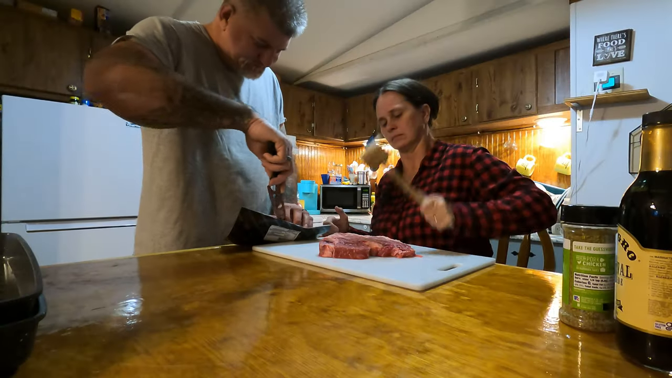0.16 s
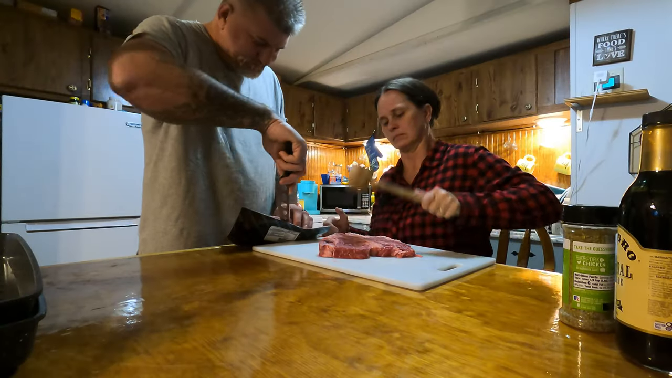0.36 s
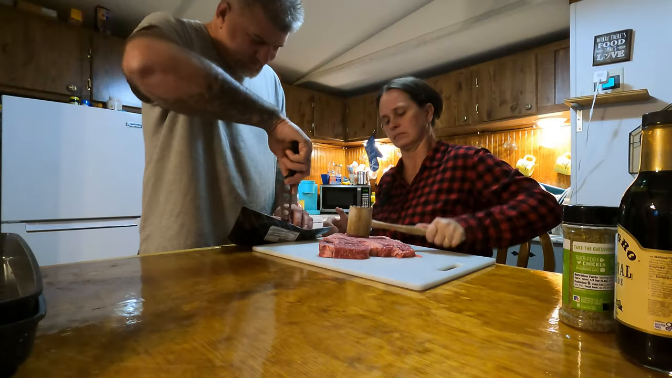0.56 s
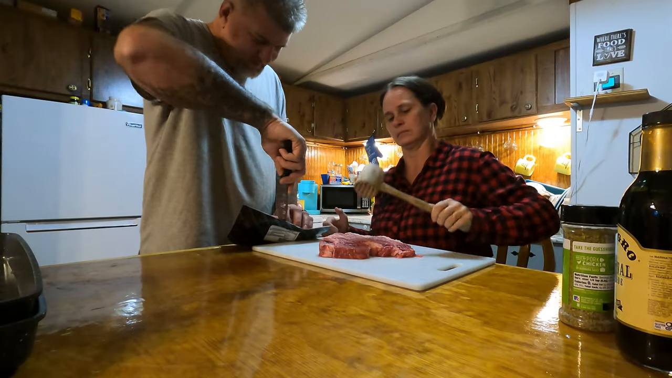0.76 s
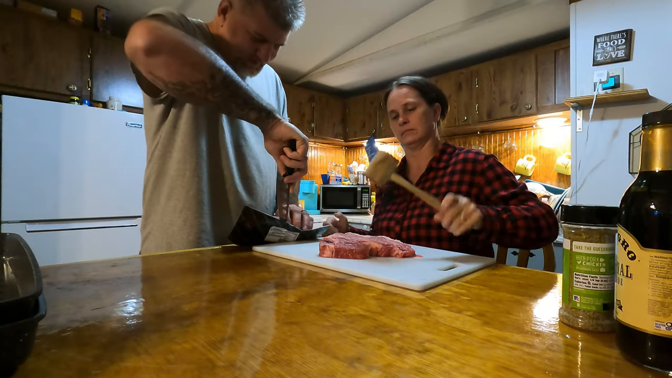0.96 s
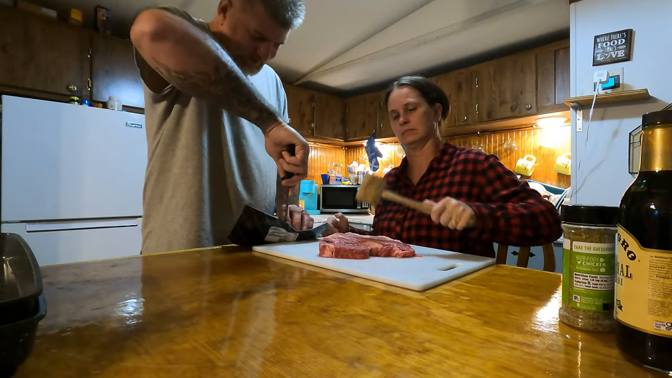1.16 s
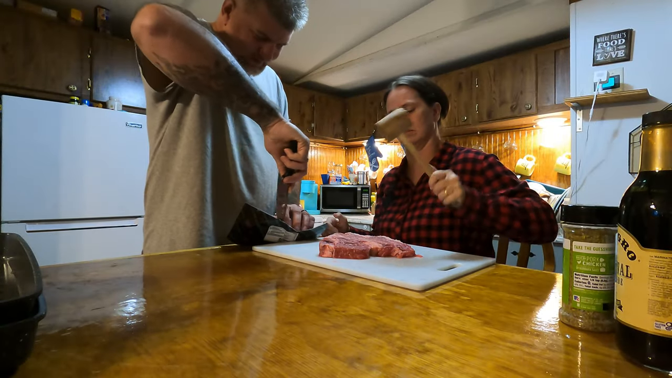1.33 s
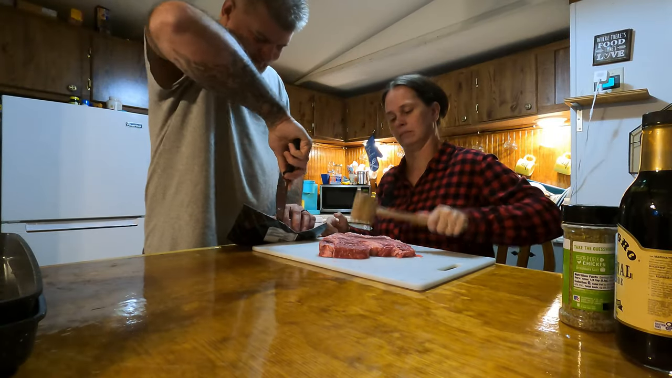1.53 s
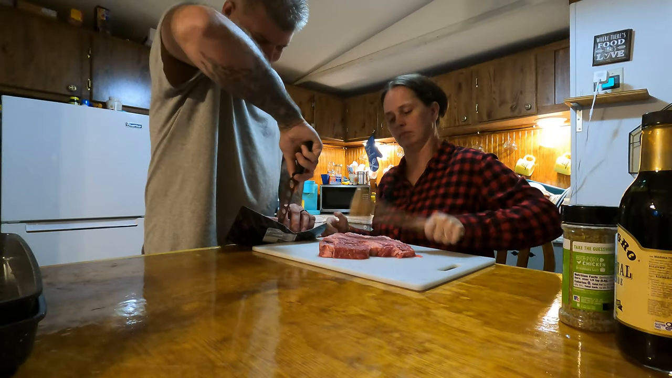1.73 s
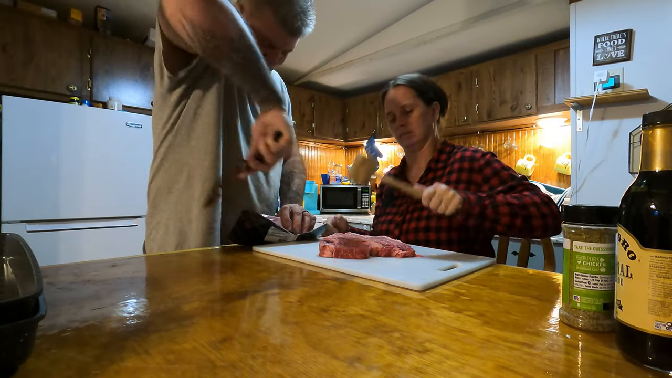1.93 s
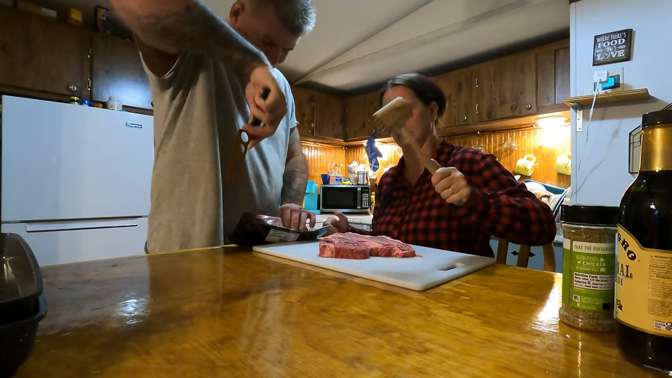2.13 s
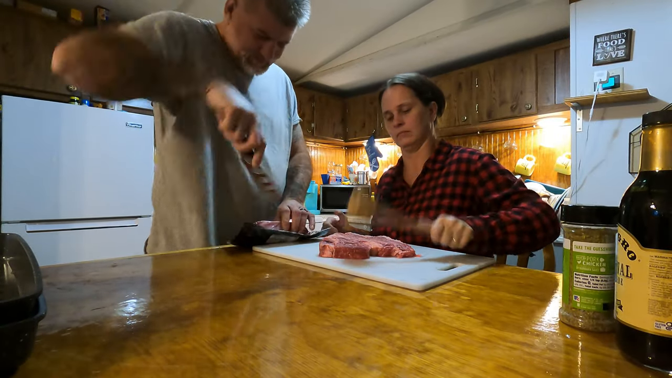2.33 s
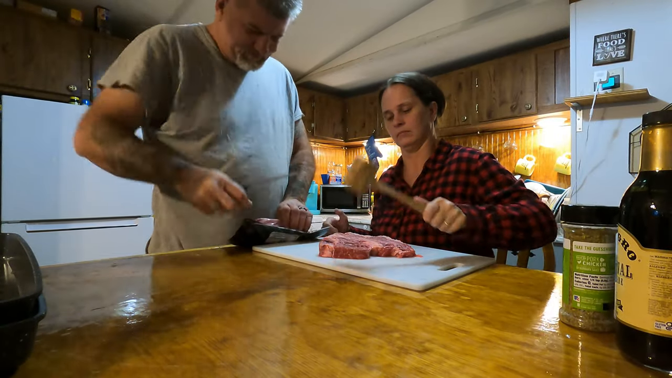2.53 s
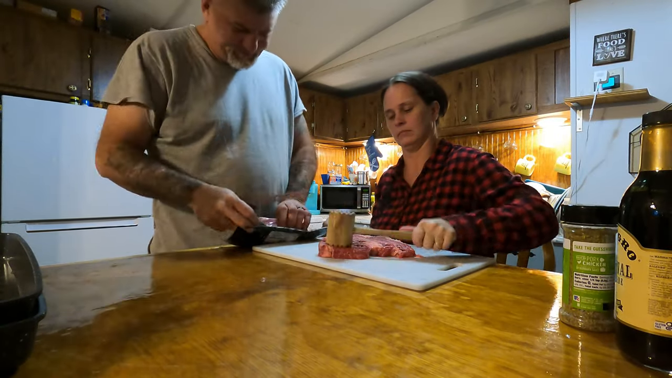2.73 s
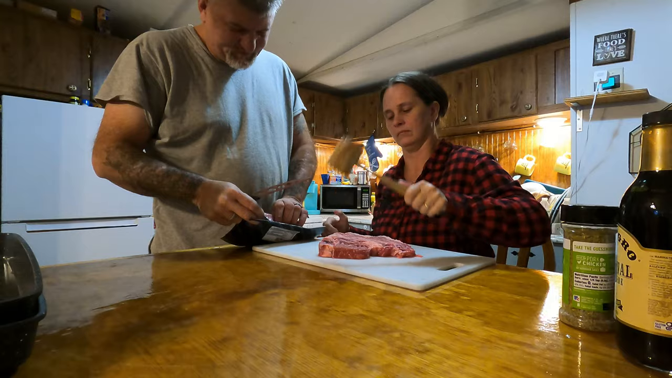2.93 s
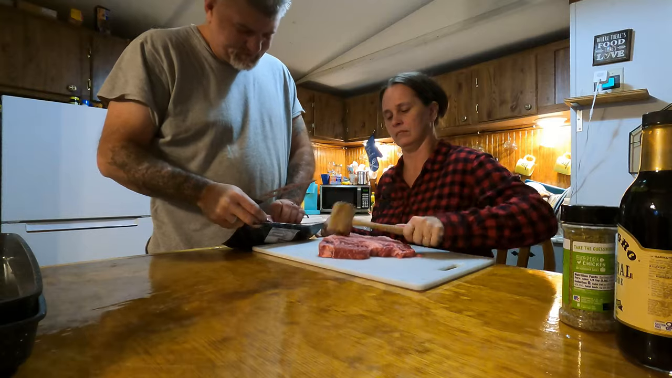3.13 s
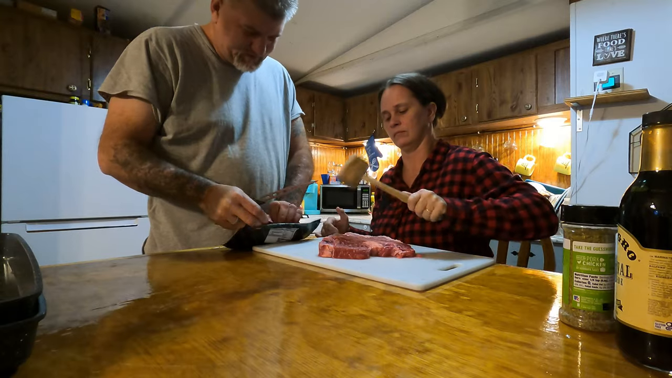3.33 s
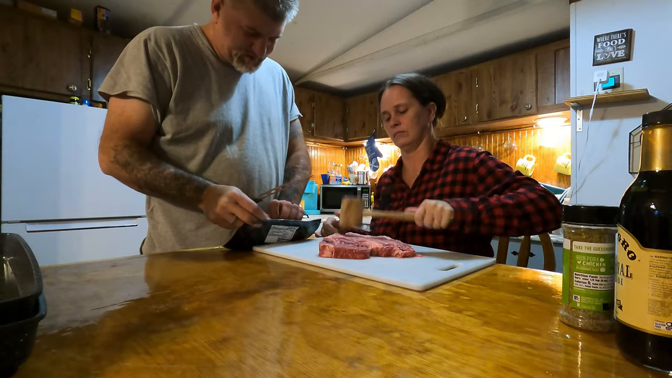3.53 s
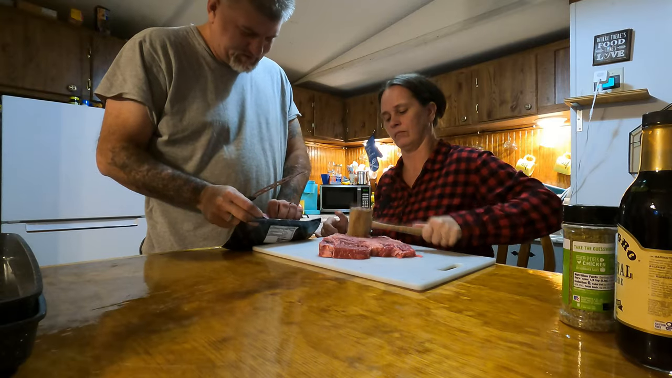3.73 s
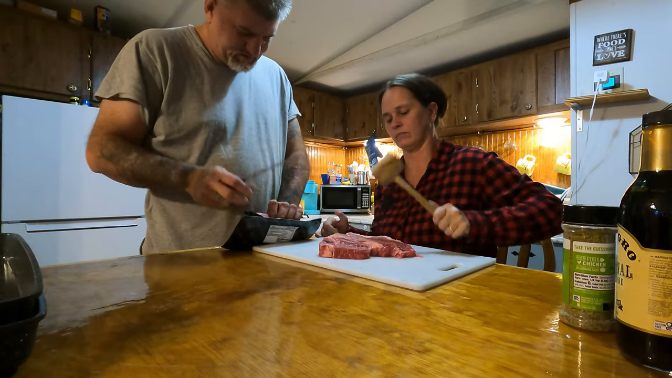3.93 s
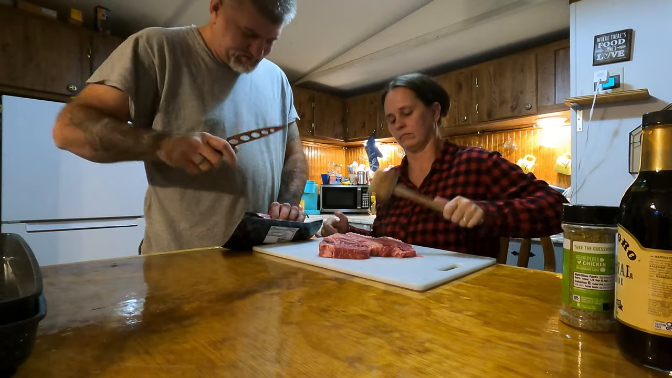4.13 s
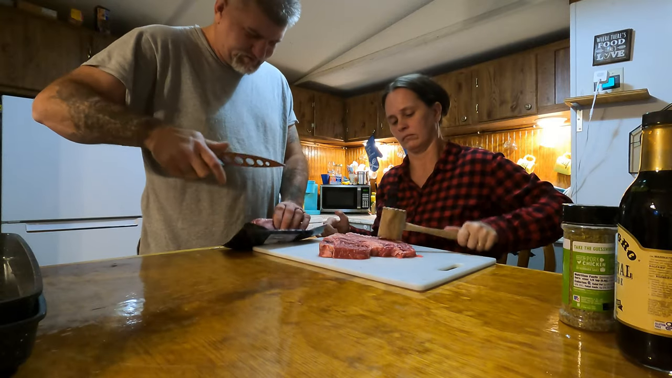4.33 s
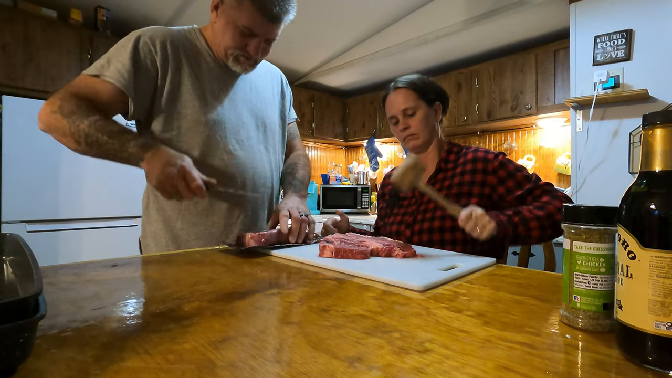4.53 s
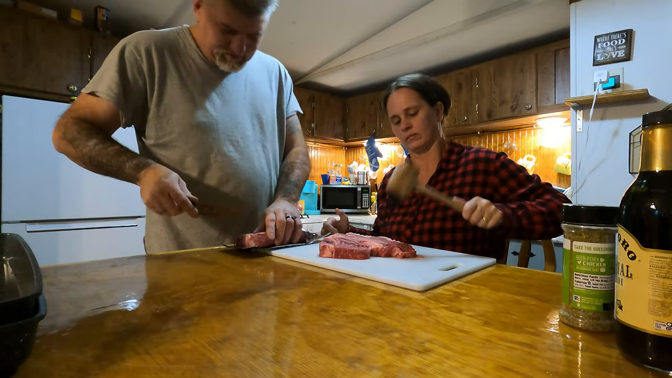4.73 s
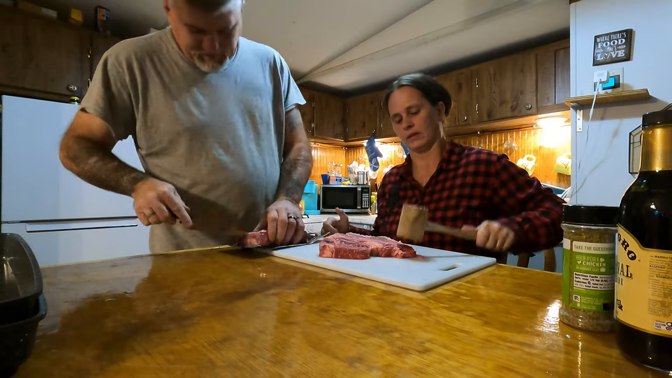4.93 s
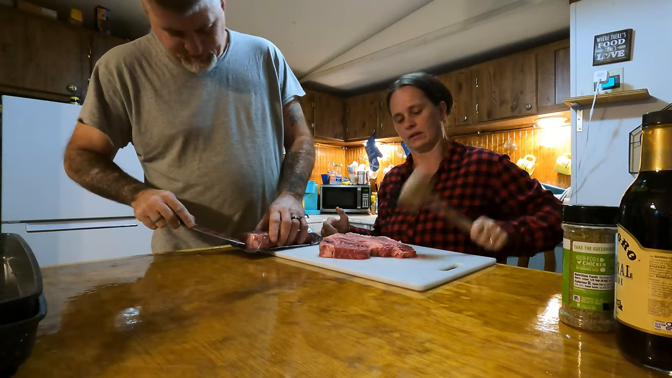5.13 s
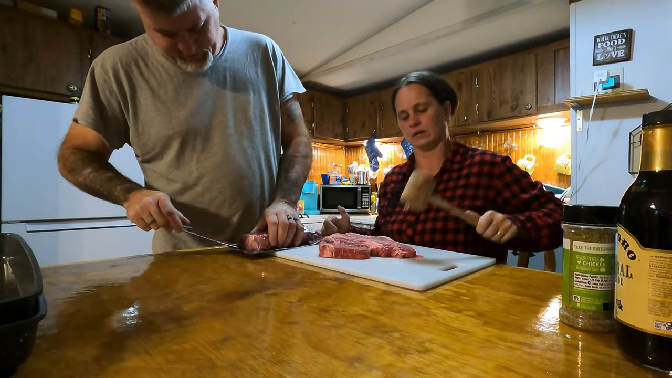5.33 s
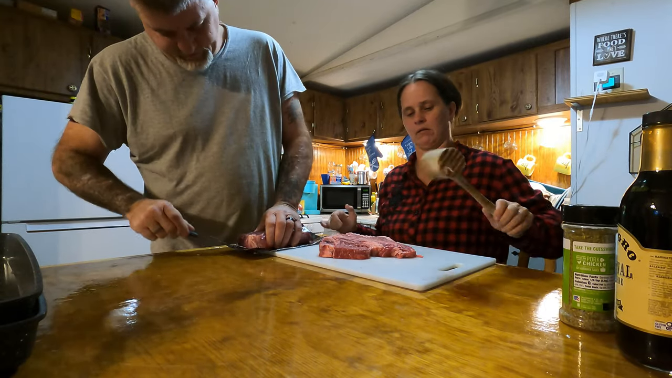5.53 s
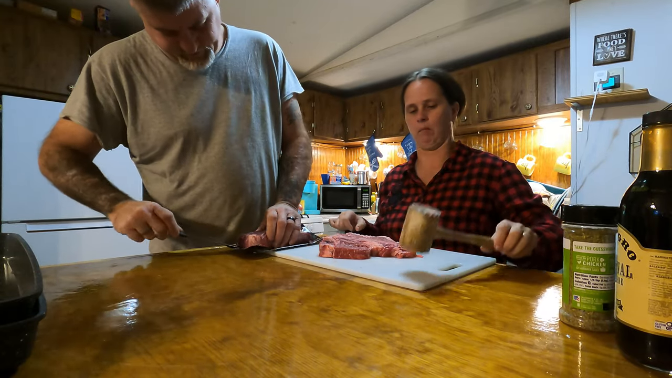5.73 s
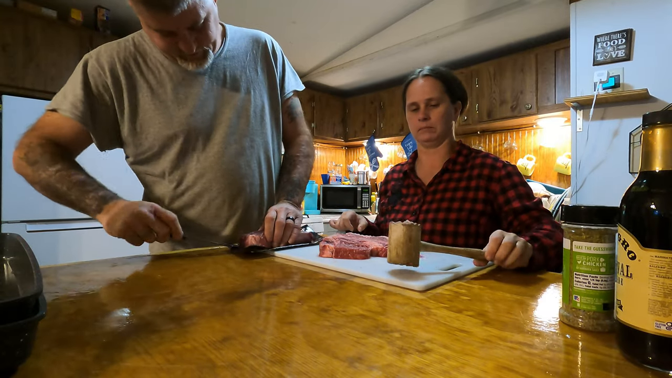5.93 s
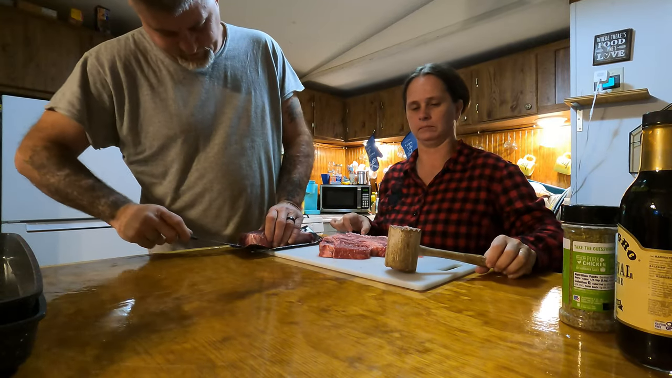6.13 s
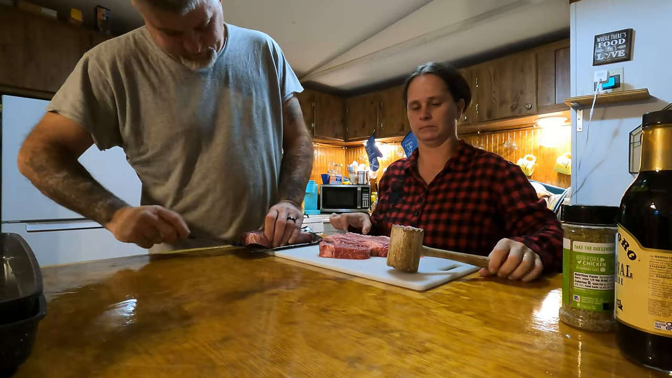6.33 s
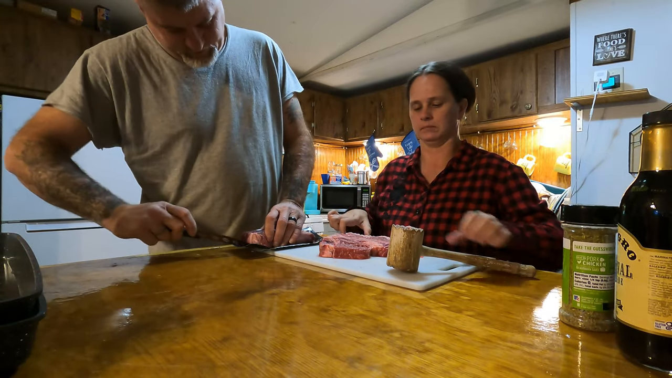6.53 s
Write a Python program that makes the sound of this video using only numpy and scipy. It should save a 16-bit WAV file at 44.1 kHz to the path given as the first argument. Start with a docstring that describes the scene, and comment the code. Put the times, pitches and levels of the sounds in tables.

```python
"""Blows of a wooden mallet on a steak, on a plastic board on a kitchen table, close to the microphone.
Each blow is a filtered-noise slap of meat, the board's crack a few ms later and a thud of damped table modes.
Thick meat cushions the head (more slap, a duller and weaker crack); the place struck sets how deep the thud is.
Between blows a fork ticks and scrapes in a plastic meat tray (stick-slip clicks); at the end the mallet
is put down on the board. Noise decaying band by band is the kitchen's reverberation, over a quiet hush."""
import sys
import numpy as np
from scipy import signal
from scipy.fft import rfft, irfft
from scipy.io import wavfile
from scipy.ndimage import uniform_filter1d, minimum_filter1d

SR = 44100
rng = np.random.default_rng(int(sys.argv[2]) if len(sys.argv) > 2 else 0)


def store_wav(level_fs):
    """Save 16-bit WAV to argv[1]."""
    pcm = np.round(np.clip(np.atleast_2d(level_fs), -1, 1) * 32767)
    wavfile.write(sys.argv[1], SR, pcm.T.astype(np.int16))


N = 294058


def amp(db):
    """Level to amplitude: 20 dB is a factor of ten."""
    return 10 ** (np.asarray(db) / 20)


def unit(x):
    """Normalization by the root mean square, to rms 1."""
    return x / np.sqrt(np.mean(x ** 2) + 1e-20)


def read(points, hz):
    """Linear interpolation of a table on a log-frequency axis."""
    f, value = np.transpose(points)
    return np.interp(np.log(hz + 1), np.log(f + 1), value)


def bell(hz, centre_hz, octaves):
    """A Gaussian resonance on the log-frequency axis, height 1."""
    return np.exp(-(np.log2((hz + 1) / centre_hz) / octaves) ** 2)


def hump(hz, centre_hz, order=2):
    """A broad resonance, in dB: the response falls with detuning on both sides of its centre."""
    ratio = (hz + 1) / centre_hz
    return -10 * order * np.log10(1 + 0.8 * (ratio - 1 / ratio) ** 2)


def coloured(x, curve_db, size=4096):
    """Minimum-phase filtering by curve_db(Hz): causality lets nothing sound before the attack."""
    hz = abs(np.fft.fftfreq(size, 1 / SR))
    log_gain = np.log(amp(np.maximum(curve_db(hz), -100)))
    # the Hilbert transform of the log gain gives the minimum phase
    response = np.exp(np.conj(signal.hilbert(log_gain)))
    taps = np.fft.ifft(response).real
    return signal.fftconvolve(x, taps[:size // 2] * np.hanning(size)[size // 2:])


def add(mix, s, sound, room_db):
    """Superposition at time s: row 0 is the direct path, row 1 goes into the room."""
    start = round(s * SR)
    sound = sound * amp([[0], [room_db]])
    sound = sound[:, max(-start, 0):]
    part = mix[:, max(start, 0):][:, :sound.shape[1]]
    part += sound[:, :part.shape[1]]


def hush():
    """Stationary noise shaped in frequency: the steady background of the kitchen."""
    # background spectrum: f/Hz, relative spectral level/dB
    hush_spectrum = [(20, 3.5), (55, 1), (110, -18), (190, 2.5), (330, -0.5), (700, -7.5), (1300, -12.5),
                     (2700, -12), (5000, -25.5), (7000, -30.5), (9000, -47), (13000, -48), (16000, -69)]
    level_db = -54  # rms
    hz = np.fft.rfftfreq(N, 1 / SR)
    spectrum = rfft(rng.standard_normal(N)) * amp(read(hush_spectrum, hz))
    return amp(level_db) * unit(irfft(spectrum, N))


def kitchen(x, first_s=0.0036, build_s=0.0016, clump_db=1.5, dense_db=4, dense_s=0.13):
    """Reverberation: reflections from cupboards and ceiling arrive in clumps, each band dying at its own speed."""
    # decay before the dense_db gain is applied: f/Hz, t60/s
    decay_times = [(60, 0.36), (170, 0.16), (380, 0.36), (800, 0.31), (2000, 0.35), (5000, 0.34),
                   (12000, 0.29)]
    # spectrum of the reflections: f/Hz, relative level/dB
    reflection_colour = [(40, 4), (100, 0), (250, 3), (500, -2), (1000, -2), (2000, -8.5), (4500, -7),
                         (7500, -4), (9000, -9.5), (11500, 7), (15000, -15)]
    age = np.arange(SR) / SR
    clumps = amp(clump_db * unit(uniform_filter1d(rng.standard_normal(SR), size=100)))
    hz, t, z = signal.stft(rng.standard_normal(SR), SR, nperseg=512)
    phases = z / abs(z)
    decay = np.exp(-np.log(1000) * t / read(decay_times, hz)[:, None])
    tail = signal.istft(phases * decay, SR, nperseg=512)[1][:SR] * clumps
    tail *= np.clip((age - first_s) / build_s, 0, 1)
    # the tail stays dense for about 130 ms, then drops
    tail *= amp(dense_db * age / dense_s * np.exp(1 - age / dense_s))
    tail = coloured(tail / np.linalg.norm(tail), lambda hz: read(reflection_colour, hz))
    return signal.oaconvolve(x, tail)[:N]


def plastic(hz, centre_hz):
    """The broad resonance of thin plastic, in dB, with a steep low-pass fall above 5800 Hz."""
    return hump(hz, centre_hz) - 10 * np.log10(1 + (hz / 5800) ** 8)


def slips(per_s, grain_db):
    """Stick-slip friction as a random train of tiny clicks of scattered size."""
    sizes = rng.standard_normal(N) * amp(grain_db * np.minimum(rng.exponential(1, N), 4))
    return sizes * (rng.random(N) < per_s / SR)


def handling(level_db=-67, centre_hz=2600, swell_db=3):
    """Friction noise under slow amplitude modulation: a faint rustle of sleeves and wrapping."""
    drift = uniform_filter1d(rng.standard_normal(N), size=6000, mode="wrap")
    swell = unit(uniform_filter1d(drift, size=2000))
    rustle = coloured(slips(per_s=5000, grain_db=-1.0), lambda hz: plastic(hz, centre_hz))[:N]
    return amp(level_db) * unit(rustle * amp(swell_db * swell))


def scrape(length_s, centre_hz):
    """Stick-slip excitation of a resonance: a short grainy stroke over thin plastic, rms 1."""
    count = int(length_s * SR)
    stroke = slips(per_s=8700, grain_db=2)[:count] * signal.windows.tukey(count, .5)
    return unit(coloured(stroke, lambda hz: plastic(hz, centre_hz))[:count])


def contact(curve_db, fade_s, rise_s=.0001, size=1024, uneven_db=3):
    """Impact excitation, with the energy of rms 1 over 5 ms.

    Row 0 is the ragged burst heard directly, row 1 the smooth pulse that all directions sum to."""
    t = np.arange(size) / SR
    fade = np.exp(-t / fade_s) * (1 - np.exp(-t / rise_s)) ** 2 * np.hanning(2 * size)[size:]
    burst = rng.standard_normal(size) * fade
    # flatten the spectrum but keep the burst's phases
    burst = irfft(np.exp(1j * np.angle(rfft(burst)))) * np.sqrt(fade)
    # each contact beams other short resonances towards the microphone
    grid_hz = np.geomspace(600, 7000, 28)
    lobes = np.transpose([grid_hz, uneven_db * rng.standard_normal(len(grid_hz))])
    ragged = coloured(burst, lambda hz: curve_db(hz) + read(lobes, hz))
    smooth = coloured(signal.unit_impulse(size), curve_db)
    pair = np.array([ragged, smooth])
    return pair / np.linalg.norm(pair, axis=1, keepdims=True) * np.sqrt(.005 * SR)


def tray(room_db=-3, scrape_room_db=0):
    """Impact and stick-slip in thin plastic: the fork slides and catches with a tick, or only scrapes."""
    # catches of the fork: t/s, level/dB, centre f/Hz
    fork_ticks = [(1.294, -30, 1990), (1.429, -37, 1850), (1.971, -26, 2250), (2.6482, -36.5, 2020),
                  (2.675, -34.5, 2000), (3.5663, -31, 3430), (4.550, -41, 2880), (5.473, -40.5, 4860),
                  (5.573, -44, 1860), (5.669, -43, 3780), (5.9946, -39.5, 3790), (6.4706, -29.5, 2660)]
    # separate short scrapes in the plastic tray, without a tick: t/s, length/s, level/dB, centre f/Hz
    lone_scrapes = [(1.911, 0.035, -26, 1970), (3.782, 0.031, -47.5, 1950), (6.16, 0.073, -48, 3040)]
    # the slide around each tick; its level is relative to the tick
    slide_lead_s, slide_s, slide_db = 0.017, 0.046, -17.5
    out = np.zeros((2, N))
    for s, level_db, centre_hz in fork_ticks:
        tick = contact(lambda hz: plastic(hz, centre_hz), fade_s=.002)
        add(out, s, amp(level_db) * tick, room_db)
        slide = amp(level_db + slide_db) * scrape(slide_s, centre_hz)
        add(out, s - slide_lead_s, slide, scrape_room_db)
    for s, length_s, level_db, centre_hz in lone_scrapes:
        add(out, s, amp(level_db) * scrape(length_s, centre_hz), scrape_room_db)
    return out


def thud(place, weight_db, push_s=0.017, scatter_db=-0.5, detune=0.017):
    """Modal superposition: the place struck sets the mix of damped table modes, swelling over push_s.

    The energy is that of rms 1 over 50 ms; weight_db favours the bass, in dB per octave."""
    # board and table modes: nominal f/Hz, level at place 0/dB, level at place 1/dB (before weighting), t60/s
    table_modes = [(70.8, -15.5, -21.5, 0.21), (95.8, -11.5, -8, 0.17), (119, -1.5, -6, 0.13),
                   (140, -0.5, -9.5, 0.091), (155.7, -2, -10, 0.21), (186.5, -1, -8.5, 0.18),
                   (202.6, -12, -5.5, 0.16), (226.8, 3, 4, 0.11), (257.8, -7, -13.5, 0.22),
                   (292.4, -8, -13, 0.24), (315.7, 1, -1, 0.14), (367.3, -2.5, -9.5, 0.19),
                   (403.2, -1, -17.5, 0.24), (469.3, -11.5, -21, 0.19), (597.5, 2.5, -8.5, 0.11),
                   (658, -5.5, -21.5, 0.21)]
    t = np.arange(SR // 2) / SR
    hz, near_db, far_db, t60 = np.transpose(table_modes)[:, :, None]
    size, shift, phase = rng.standard_normal((3, len(hz), 1))
    level_db = near_db + np.clip(place, 0, 1) * (far_db - near_db)
    level_db = level_db - weight_db * np.log2(hz) + scatter_db * size
    fade = np.exp(-np.log(1000) * t / t60)
    waves = np.sin(2 * np.pi * (hz * (1 + detune * shift) * t + phase))
    ring = (amp(level_db) * fade * waves).sum(0)
    ring *= 1 - np.exp(-t / push_s)
    return ring / np.linalg.norm(ring) * np.sqrt(.05 * SR)


def knocks(room_db=-4, thud_room_db=-8, head_hz=720, head_db=6):
    """Contact stiffness: softer knocks lose treble; the wooden head gives a hollow note over the table's modes."""
    # dull knocks of wood and hand on the board: t/s, force level/dB, place (0-1), hardness as corner f/Hz
    board_knocks = [(1.041, -43, 0.9, 1410), (5.9174, -15.5, 0.9, 750), (6.064, -12.5, 0, 1090),
                    (6.3635, -29, 1, 1000), (6.519, -35, 0.4, 1310)]
    # wood on the bare board: f/Hz, relative spectral level/dB
    wood_spectrum = [(100, -13), (350, 7.5), (1000, 0), (2400, 0), (3500, -9), (6000, -10.5), (9000, -34),
                     (16000, -28)]
    # thud against contact at 1 kHz hardness (dB), and its change per octave of hardness (dB)
    base_thud_db, hard_thud_db = -9.5, -11.5
    # bass weight at force 0 dB (dB per octave), and its change per dB of force
    base_weight_db, weight_per_db = 3.5, 0.14
    out = np.zeros((2, N))
    for s, force_db, place, hard_hz in board_knocks:
        def soft(hz):
            treble_loss_db = 10 * np.log10(1 + (hz / hard_hz) ** 3)
            return read(wood_spectrum, hz) - treble_loss_db + head_db * bell(hz, head_hz, 0.18)

        thud_db = force_db + base_thud_db + hard_thud_db * np.log2(hard_hz / 1000)
        weight_db = base_weight_db + weight_per_db * force_db
        add(out, s, amp(force_db) * contact(soft, fade_s=0.0083), room_db)
        add(out, s, amp(thud_db) * thud(place, weight_db, push_s=0.0038), thud_room_db)
    return out


def mallet(thud_room_db=-8, room_db=-0.8, ring_db=1.5, ring_octaves=0.37, onset_db=-29, onset_lead_s=0.006):
    """Cushioned impact: slap, crack and thud, set by force, cushion and place."""
    # blows: t/s, force level/dB, cushion of meat under the head (0-1), time to squash it/s,
    # place on the steak (0-1)
    blow_list = [(.0085, -.5, 0.66, .0036, 0.34), (0.2994, 1, 0.6, 0.0046, 0.37),
                 (0.5907, 0, 0.83, 0.0046, 0.36), (1.5391, 1.5, 0.23, 0.0039, 0.5),
                 (1.8292, -.5, 0.25, 0.0045, 0.64), (2.433, -0.5, 0.54, 0.0078, 0.01),
                 (2.7756, -2, 0.79, 0.0064, .05), (3.2066, 1, 0.18, 0.0016, 0.1),
                 (3.5224, -7.5, 0.78, 0.0041, 0.8), (3.8193, -1, 0.62, 0.0035, 0.87),
                 (4.087, -3.5, 0.8, .0036, 0.23), (4.3832, -1.5, .35, 0.0066, 1),
                 (4.6723, .5, 0.27, .005, 0.99), (4.953, .5, 0.37, 0.0058, 1),
                 (5.2522, -0.5, 0.44, .0046, 0.99)]
    # wet slap of the meat: f/Hz, relative spectral level/dB
    slap_spectrum = [(150, -12.5), (400, 6.5), (800, 14), (1400, 2.5), (2200, 8.5), (3200, -4), (4500, -13),
                     (6500, -23.5), (8500, -37), (12000, -38), (16000, -76)]
    # crack of the board: f/Hz, relative spectral level/dB
    crack_spectrum = [(150, -0.5), (400, 13), (750, 7.5), (1000, 6), (2000, 6), (3200, -1), (4300, -7.5),
                      (6500, -25.5), (8700, -41.5), (11500, -54.5), (16000, -98)]
    # levels at force 0 dB with half a cushion
    base_slap_db, base_crack_db, base_thud_db = -17.5, -8.5, -17
    # a full cushion against none: more slap, less crack
    cushion_slap_db, cushion_crack_db = 12, -3.5
    # from place 0 to place 1 the thud loses bass weight (dB per octave) and the contacts ring higher
    deep_weight_db, shallow_weight_db = 5.5, -0.35
    deep_ring_hz, shallow_ring_hz = 1470, 4400
    # treble tilt of a bare blow at place 0, its change with a full cushion and at place 1 (dB per octave)
    bare_tilt_db, cushion_tilt_db, place_tilt_db = 3, -1.5, 1.34
    out = np.zeros((2, N))
    for s, force_db, cushion, squash_s, place in blow_list:
        place = np.clip(place, 0, 1)
        slap_db = force_db + base_slap_db + cushion_slap_db * (cushion - .5)
        crack_db = force_db + base_crack_db + cushion_crack_db * (cushion - .5)
        tilt_db = bare_tilt_db + cushion_tilt_db * cushion + place_tilt_db * place
        weight_db = shallow_weight_db + (deep_weight_db - shallow_weight_db) * (1 - place) ** 2
        ring_hz = deep_ring_hz * (shallow_ring_hz / deep_ring_hz) ** (place ** 2)

        def colour(hz):
            octaves = np.log2(np.clip(hz, 700, 6000) / 2000)
            return tilt_db * octaves + ring_db * bell(hz, ring_hz, ring_octaves)

        def meat(hz):
            return read(slap_spectrum, hz) + colour(hz)

        def board(hz):
            return read(crack_spectrum, hz) + colour(hz)

        # faint noise rises just ahead of the slap
        onset = amp(force_db + onset_db) * contact(meat, fade_s=0.0084, rise_s=0.0021)
        slap = amp(slap_db) * contact(meat, fade_s=0.0021, rise_s=0.00011)
        crack = amp(crack_db) * contact(board, fade_s=0.003)
        add(out, s - onset_lead_s, onset, room_db)
        add(out, s, slap, room_db)
        add(out, s + squash_s, crack, room_db)
        add(out, s, amp(force_db + base_thud_db) * thud(place, weight_db), thud_room_db)
    return out


def scene(count=5, step_s=.3):
    """Direct sound plus reverberation, whose reflection pattern drifts as arms and mallet move."""
    direct, spread = mallet() + knocks() + tray() + handling()
    stance = np.arange(N) / SR / step_s
    room = 0
    # equal-power crossfades lead through the patterns in a cycle, one every step_s
    for k in range(count):
        share = np.maximum(1 - abs((stance + k) % count - 1), 0)
        room = room + kitchen(spread * np.sqrt(share))
    return (direct + room + hush())[None]


def record(dry, low_hz=40, ceiling=1.06, size=60, edge_hz=16200):
    """Band limiting and compression: deep bass is dropped, a fast limiter holds the cracks, whose tips may clip."""
    x = signal.sosfilt(signal.butter(3, low_hz, "highpass", fs=SR, output="sos"), dry)
    gain = minimum_filter1d(1 / np.maximum(abs(x) / ceiling, 1), size)
    held = np.clip(x * uniform_filter1d(gain, size), -.96, .96)
    low_pass = signal.firwin(511, edge_hz, window=("kaiser", 9), fs=SR)
    return signal.oaconvolve(held, low_pass[None], "same")


dry = scene()
out = record(dry)
store_wav(out)
```